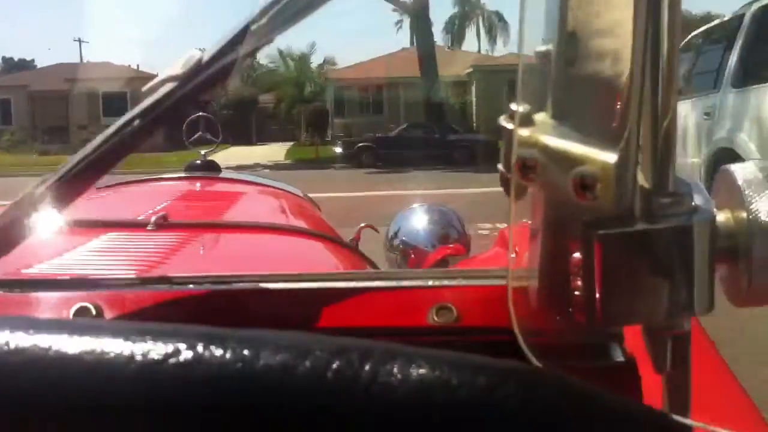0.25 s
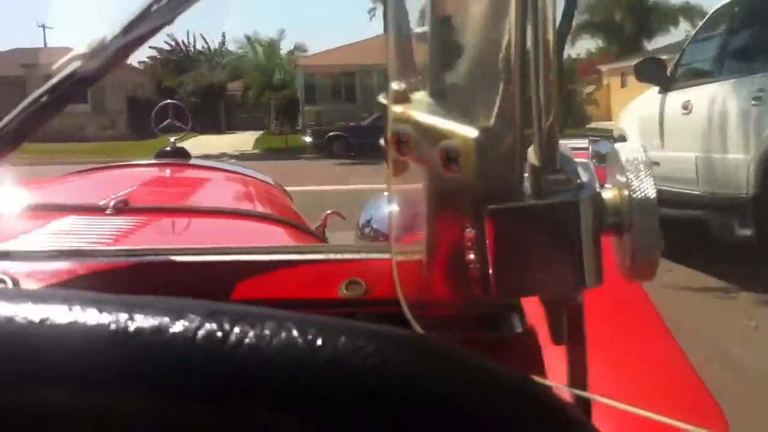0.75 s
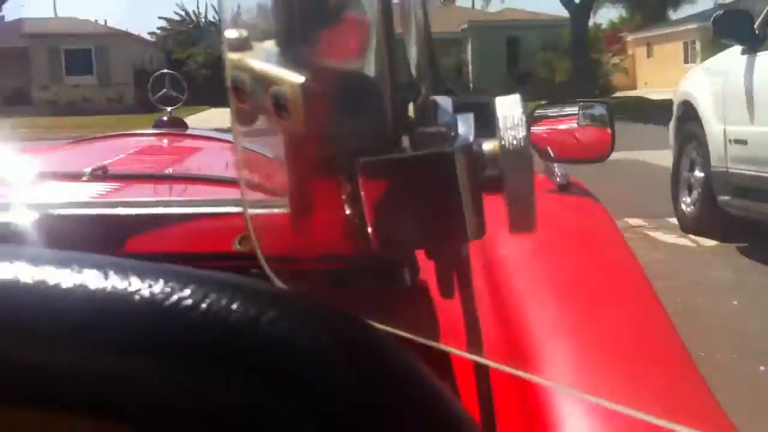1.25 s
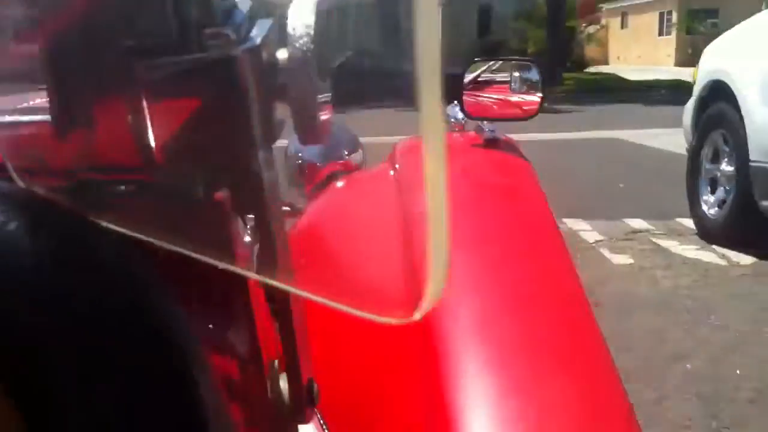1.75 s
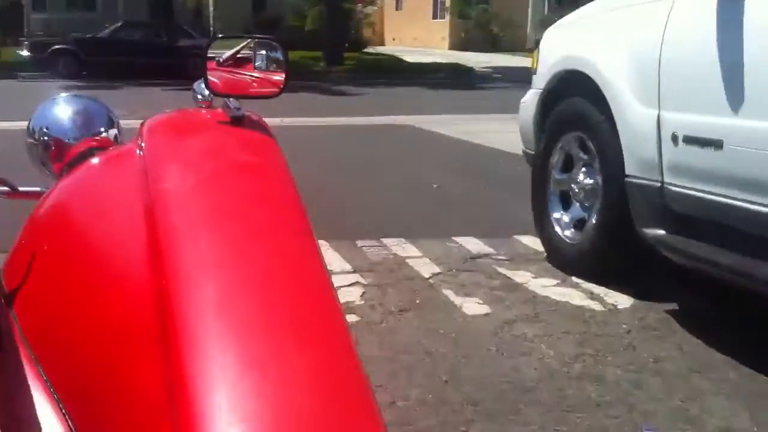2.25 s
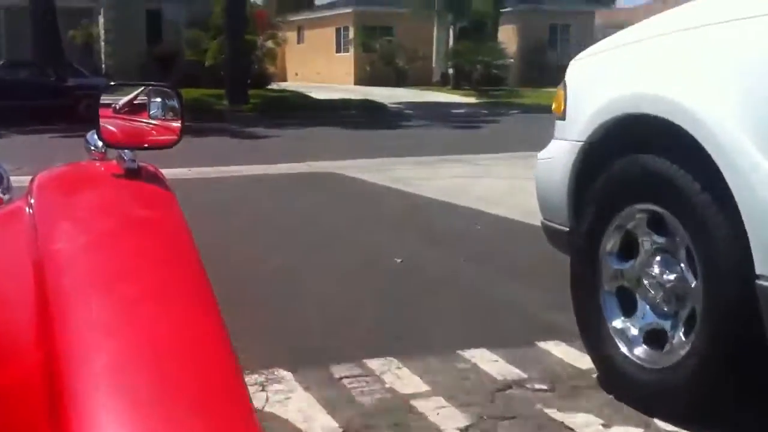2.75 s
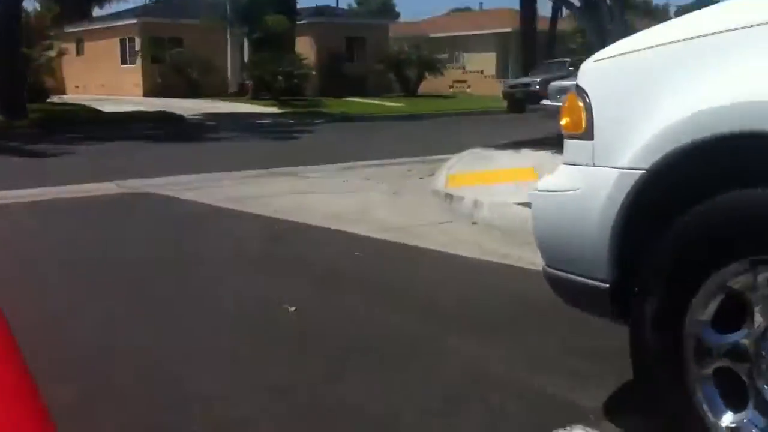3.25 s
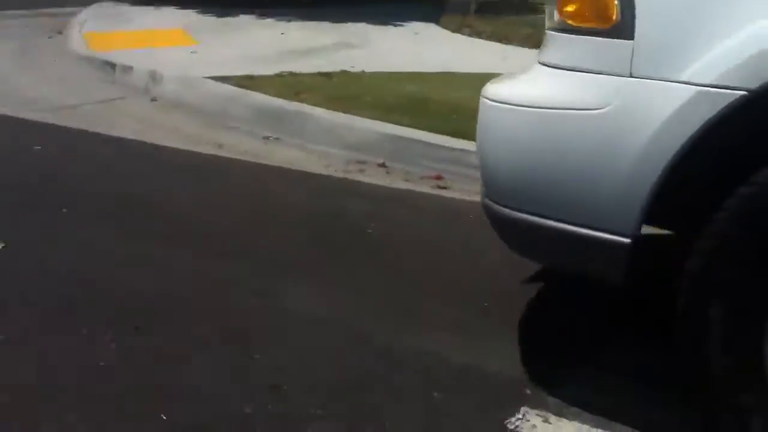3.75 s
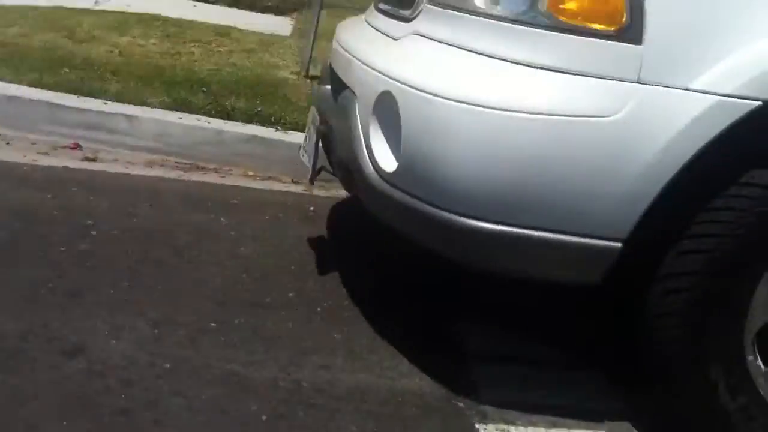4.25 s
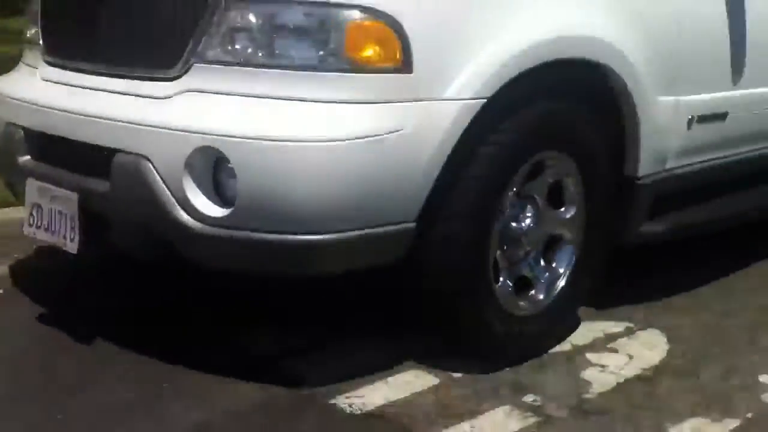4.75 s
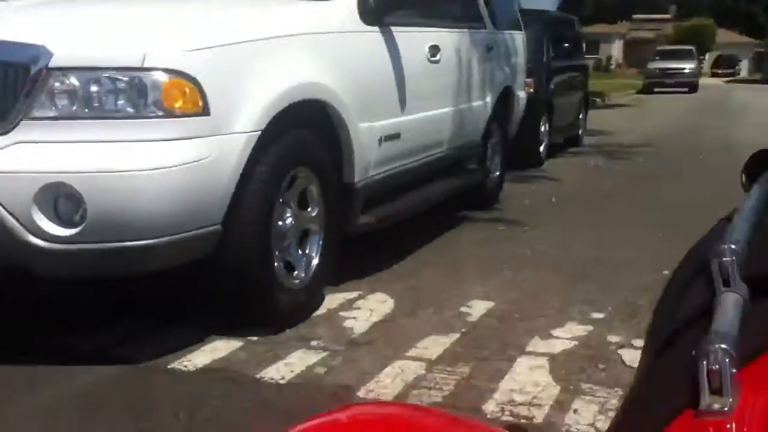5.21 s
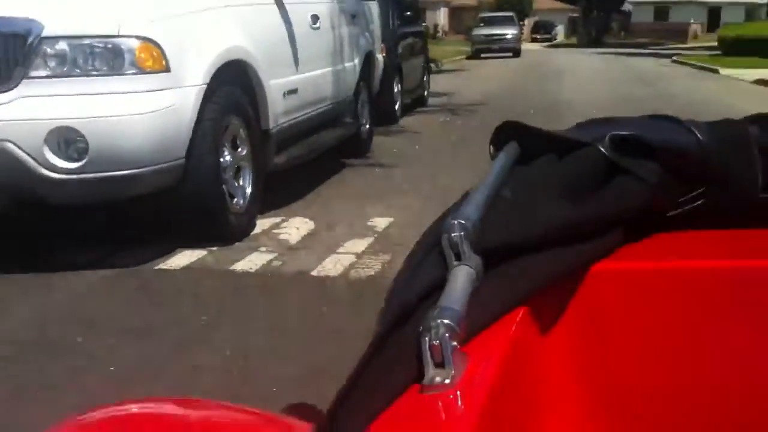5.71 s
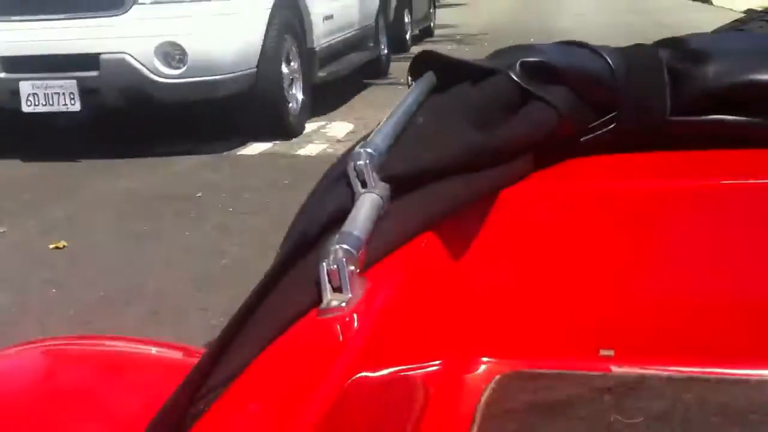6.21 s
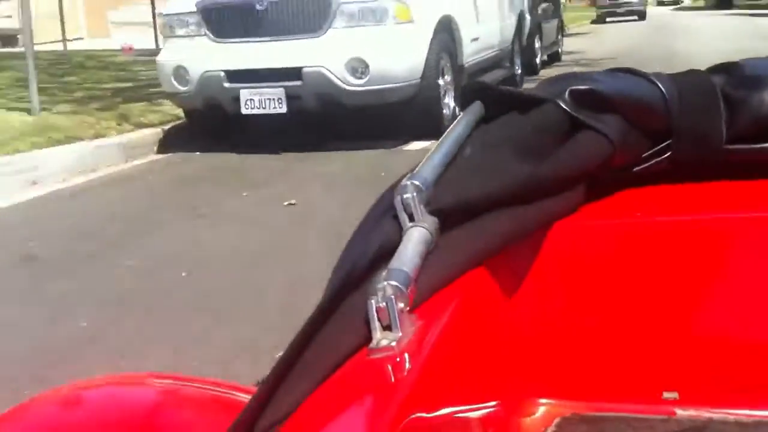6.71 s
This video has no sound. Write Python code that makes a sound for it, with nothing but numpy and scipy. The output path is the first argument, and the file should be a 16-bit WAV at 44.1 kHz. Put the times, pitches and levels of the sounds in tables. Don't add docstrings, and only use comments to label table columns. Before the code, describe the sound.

Steady low motor hum with faint whine in an open car, gradually overtaken by uneven wind buffeting, growing into a loud, cracking roar.

```python
import sys
import numpy as np
from scipy import signal
from scipy.io import wavfile
from scipy.ndimage import uniform_filter1d, minimum_filter1d, map_coordinates

SR = 44100
rng = np.random.default_rng(int(sys.argv[2]) if len(sys.argv) > 2 else 0)


def unload_wav(signal):
    wavfile.write(
        sys.argv[1],
        SR,
        np.round(np.clip(np.atleast_2d(signal).T, -1, 1) * 32767).astype(np.int16),
    )


def magnitude_from_level(level_db):
    exponent = np.asarray(level_db, float) / 20
    return 10 ** exponent


N = 307377


def rms_one(x):
    return x / np.sqrt(np.mean(x ** 2) + 1e-20)


def in_time(rows):
    s, *columns = np.transpose(rows)
    return [np.interp(np.arange(N) / SR, s, c) for c in columns]


def at_hz(points, hz):
    points = np.array(points)
    return np.interp(np.log(hz), np.log(points[:, 0]), points[:, 1])


def drift(rate_hz):
    r = np.exp(-32 * np.pi * rate_hz / SR)
    slow = signal.lfilter([1], [1, -2 * r, r * r], rng.standard_normal(N // 16 + 4002))
    slow = slow[4000:]
    return np.interp(np.arange(N) / 16, np.arange(len(slow)), rms_one(slow))


def resonance(x, hz, width_hz):
    r = np.exp(-np.pi * width_hz / SR)
    return signal.lfilter([1 - r, 0, r - 1], [1, -2 * r * np.cos(2 * np.pi * hz / SR), r * r], x)


def banded_noise(edges, level_db, patchy_db):
    out, white = 0, rng.standard_normal((2, N))
    for k, (low, high) in enumerate(zip(edges, edges[1:])):
        band_pass = signal.butter(2, [low, high], "band", fs=SR, output="sos")
        band = signal.sosfilt(band_pass, white[k % 2])
        out = out + band * magnitude_from_level(level_db(np.sqrt(low * high)) + patchy_db * drift(13.2))
    return rms_one(out)


# (time [s], four-stroke cycles per second [Hz])
ENGINE_SPEED = [(0, 11.38), (.6, 11.32), (1.05, 11.36), (1.5, 10.93), (2, 10.25), (3, 9.56), (4, 9.05),
                (4.9, 8.33), (5.5, 8.25), (6.97, 8.38)]


def crank_cycles():
    return np.cumsum(in_time(ENGINE_SPEED)[0]) / SR


# (multiple of the cycle [1], level [dB])
FRONT_ORDERS = [(1, -40), (2, -39), (3, -39), (4, -33), (5, -36), (6, -21), (7, -22), (8, -6), (9, -18),
                (10, -11), (11, -20), (12, -6), (13, -21), (14, -4), (15, -17), (16, -8), (17, -9), (18, 0),
                (19, -4), (20, -7), (21, -12), (22, -5), (23, -13), (24, -19), (25, -22), (26, -20),
                (27, -23), (28, -24), (29, -21), (30, -23)]
# (multiple of the cycle [1], level [dB])
TAIL_ORDERS = [(1, -46), (2, -41), (3, -45), (4, -40), (5, -41), (6, -34), (7, -28), (8, -12), (9, -22),
               (10, -13), (11, -13), (12, -5), (13, -15), (14, -13), (15, -12), (16, -7), (17, -7),
               (18, -3), (19, -10), (20, 0), (21, -5), (22, 0), (23, -3), (24, 0), (25, -9), (26, -11),
               (27, -5), (28, -9), (29, -10), (30, -10)]


def hum(cycles, tail):
    out, power = 0, 0
    for (order, front_db), (_, tail_db) in zip(FRONT_ORDERS[4:], TAIL_ORDERS[4:]):
        level = magnitude_from_level(front_db + tail * (tail_db - front_db))
        wander = .012 * order * drift(3)
        out = out + level * np.sin(2 * np.pi * (order * cycles + rng.random()) + wander)
        power = power + level ** 2 / 2
    return out / np.sqrt(power)


# (frequency [Hz], level [dB per Hz])
RUMBLE_SPECTRUM = [(25, -29), (50, -9), (70, -44), (110, -23), (170, 4), (210, 7), (260, -1), (320, -14)]


def rumble(tail):
    edges = 22.5 * 2 ** np.arange(0, 4, 1 / 3)
    return magnitude_from_level(-14 + 12 * tail) * banded_noise(edges, lambda hz: at_hz(RUMBLE_SPECTRUM, hz), patchy_db=1.5)


def firing_gate(cycles, depth_db, uneven_db):
    return magnitude_from_level(depth_db * np.cos(8 * np.pi * cycles) + uneven_db * np.cos(4 * np.pi * cycles + 1))


# (frequency [Hz], level [dB per Hz])
FRONT_CLATTER = [(170, -37), (290, -13), (365, 1), (483, -7.5), (749, -5), (982, -5.5), (1110, -16.5),
                 (1590, -13.5), (1780, -12), (3500, -21), (4550, -48), (7700, -120)]
# (frequency [Hz], level [dB per Hz])
TAIL_CLATTER = [(170, -31), (290, 13), (595, -12), (640, 1), (703, -3), (2410, -16), (3500, -46),
                (4550, -68), (7700, -120)]


def clatter(cycles, tail):
    def colour(hz):
        return at_hz(FRONT_CLATTER, hz) * (1 - tail) + at_hz(TAIL_CLATTER, hz) * tail
    edges = 285 * 2 ** np.arange(0, 3.6, .25)
    return banded_noise(edges, colour, patchy_db=1.5) * firing_gate(cycles, depth_db=0.0, uneven_db=0.1)


# (time [s], level [dB])
VALVE_LEVEL = [(0.0, -47), (0.39, -47.5), (1.1, -43), (1.8, -47.5), (2.3, -44.5), (2.79, -43.5),
               (3.0, -47.5), (3.6, -46), (4.75, -49.5), (5.35, -46.5), (5.63, -47.5), (5.75, -52.5),
               (6.6, -55), (6.97, -58)]
# (frequency [Hz], level [dB per Hz])
HISS_SPECTRUM = [(1470, -30), (2500, -25.5), (3200, -1), (4650, 1.5), (5150, -1.5), (6350, -1.5),
                 (7640, -8.5), (9720, -5.5), (11100, -13), (14700, -7.5), (16000, -19)]


def hiss(cycles):
    valve_db, = in_time(VALVE_LEVEL)
    air_db = valve_db - 10.5 - 0.24 * np.arange(N) / SR

    def colour(hz):
        return at_hz(HISS_SPECTRUM, hz) + (valve_db if hz < 8200 else air_db + 11)
    edges = 2900 * 2 ** np.arange(0, 2.6, .25)
    noise = magnitude_from_level(-49) * banded_noise(edges, colour, patchy_db=2.0)
    flicker = magnitude_from_level(0.85 * drift(17))
    return noise * flicker * firing_gate(cycles, depth_db=1.35, uneven_db=-0.2)


# (frequency [Hz], width [Hz], level [dB])
WHINE_LINES = [
    (898, 170, -58),
    (1060, 360, -54),
    (837, 54, -63.5),
]


def whines():
    out, white = 0, rng.standard_normal(N)
    for hz, width_hz, db in WHINE_LINES:
        line = resonance(resonance(white, hz, width_hz), hz, width_hz)
        out = out + magnitude_from_level(db + 2 * drift(1.6)) * rms_one(line)
    return out


# (middle [s], length [s], frequency [Hz], glide [Hz per s], level [dB])
GEAR_WHISTLES = [(1, .12, 1110, -60, -44), (1.7, 0.23, 970, -110, -50), (.72, .12, 720, 60, -56),
                 (.98, 0.08, 915, 0, -51), (.44, .07, 1125, 40, -52)]


def whistles():
    out, t, shake = 0, np.arange(N) / SR, .7 * drift(13)
    for s, length, hz, glide, db in GEAR_WHISTLES:
        age = t - s
        tone = np.sin(2 * np.pi * (hz + glide * age / 2) * age + shake)
        out = out + magnitude_from_level(db + 6.0) * np.exp(-(age / length) ** 2) * tone
    return out


def through_port(pressure):
    return signal.sosfilt(signal.butter(4, 115, "high", fs=SR, output="sos"), pressure)


def swing(width_ms, turn, order=3):
    u = np.arange(-100, 100) * 1000 / SR / width_ms
    return np.real(np.exp(2j * np.pi * turn) / (1 - 1j * u) ** order) * np.hanning(len(u))


def crackle(octaves, per_s=400, spread_db=6.0):
    born = rng.random(N) < per_s * 2 ** (1.5 * octaves) / SR
    strength_db = spread_db * np.minimum(rng.exponential(1, N), 3.5) + 6.7 * octaves
    sizes = born * magnitude_from_level(strength_db) * rng.choice([-1, 1], N)
    dealt = rng.integers(0, 3, N)
    shapes = [swing(0.13, 0.16), swing(1.0, 0.13), swing(0.13, 0.16)]
    return sum(np.convolve(sizes * (dealt == k), shape, "same") for k, shape in enumerate(shapes))


# (time [s], level [dB], brightness [dB])
BREEZE = [(1.6, -44.5, -20), (1.72, -30.5, -20), (2.5, -29, -20), (3.18, -33, -17.5), (3.24, -48, -20),
          (3.64, -47, -20), (3.7, -29.5, -20), (4.15, -30, -20), (4.29, -36, -22), (4.42, -23.5, -24),
          (4.68, -28.5, -24), (4.76, -38, -20), (5.3, -39, -20), (5.5, -28, -22), (6.2, -22, -22),
          (6.6, -28, -22), (6.66, -36, -23.5), (6.97, -23.5, -15.5)]
# (start [s], length [s], level [dB], brightness [dB])
GUSTS = [(1.686, 0.072, -24, -27), (1.87, 0.12, -19, -29.5), (2.013, 0.054, -22.5, -25),
         (2.076, 0.09, -18, -27.5), (2.222, 0.056, -19, -32), (2.285, 0.056, -17.5, -28),
         (2.533, 0.054, -15.5, -23), (2.745, 0.055, -14.5, -21.5), (2.904, 0.033, -19.5, -20.5),
         (2.975, 0.039, -11, -23.5), (3.025, 0.021, -17, -19), (3.087, 0.051, -14.5, -21),
         (3.145, 0.011, -16.5, -19), (3.177, 0.032, -21.5, -20.5), (3.377, 0.039, -19.5, -25),
         (3.71, 0.044, -23, -22.5), (3.8, 0.026, -18.5, -18), (4.053, 0.04, -15, -29),
         (4.39, 0.028, -17.5, -25), (4.512, 0.051, -13, -17), (4.574, 0.0133, -15.5, -19.5),
         (4.59, .062, -12, -20), (5.448, 0.064, -16.5, -20), (5.534, 0.028, -12.5, -21),
         (5.572, 0.048, -11, -18), (5.64, 0.024, -19, -24), (5.663, 0.037, -11.5, -17),
         (5.7, 0.029, -17.5, -18), (5.753, 0.0397, -13.5, -17), (5.79, 0.037, -16.5, -19),
         (5.832, 0.054, -12, -22), (5.914, 0.022, -18, -19), (5.938, 0.25, -13.5, -15),
         (6.198, 0.032, -15.5, -27.5), (6.255, 0.024, -17.5, -20.5), (6.298, 0.033, -12.5, -18),
         (6.336, 0.037, -18.5, -19.5), (6.375, 0.082, -13, -18), (6.454, 0.06, -14, -16),
         (6.614, 0.028, -18, -15.5), (6.681, 0.019, -18.5, -18.5), (6.7, .1, -14.5, -16),
         (6.804, 0.24, -12.5, -11)]
# (time [s], peak level [dB], brightness [dB])
PUFFS = [(1.786, -17, -26), (1.834, -13, -27.5), (1.895, -8, -30.5), (1.937, -8.5, -32.5),
         (2.125, -8.5, -28.5), (2.237, -12, -31), (2.43, -17.5, -24), (2.783, -2.5, -17), (2.978, 5, -23.5),
         (3.119, -3, -13), (3.462, -12.5, -24.5), (3.68, -6, -27), (3.899, -16, -26), (3.994, -19.5, -21.5),
         (4.13, -8.5, -33), (4.356, -18.5, -24), (4.429, -8.5, -25), (4.454, -1, -20), (4.613, -5, -22.5),
         (4.674, -9, -27), (5.576, -0.5, -14), (6.261, -8.5, -19.5), (5.755, -4, -16.5), (5.85, -5, -31.5),
         (5.941, 0, -10.5), (6.037, -0.5, -10.5), (6.123, -0.5, -11), (6.544, -6, -15.5),
         (6.703, -6, -14.5), (6.9, -2.5, -12.5)]


def stream_power():
    level_db, bright_db = in_time(BREEZE)
    ms = np.arange(N) / SR * 1000
    power = magnitude_from_level(2 * level_db) * (ms > BREEZE[0][0] * 1000) + 1e-12
    tone = power * (bright_db + 17.5)
    # (start [s], level [dB], brightness [dB], hold [ms], rise [ms], fall [ms])
    swells = [(s, db, bright, length * 1000, 2.466, 5.) for s, length, db, bright in GUSTS]
    swells += [(s - .0014, db - 11, bright, 0, 1.6, 11) for s, db, bright in PUFFS]
    lull_db, lulls_hz, steady_ms = 3., 35.3, 45
    lulls = magnitude_from_level(-2 * lull_db * np.maximum(drift(lulls_hz) + 0.2904, 0) ** 1.497)
    for s, db, bright, hold_ms, rise_ms, fall_ms in swells:
        start = round(s * SR)
        age = ms[:min(N - start, SR // 2)]
        near = slice(start, start + len(age))
        after = np.maximum(age - np.maximum(hold_ms - fall_ms, 0), 0)
        swell = magnitude_from_level(2 * db) * (1 - np.exp(-age / rise_ms)) ** 2 * np.exp(-(after / fall_ms) ** 2)
        swell *= lulls[near] ** np.clip(hold_ms / steady_ms - 1, 0, 1)
        power[near] += swell
        tone[near] += swell * (bright + 17.2)
    return power, tone / power


# (time [s], edge peak [dB], top end under it [dB])
SNAPS = [(1.9398, -36.5, -11), (2.1234, -36, -9), (2.2363, -37.5, -10), (2.5408, -32.5, -15),
         (2.5796, -35.5, -11), (2.7819, -32, -14), (2.7876, -26.5, -27), (2.924, -35, -13),
         (2.9791, -31, -22), (2.9964, -35, -17), (3.0146, -37, -13), (3.0368, -35, -14), (3.046, -38, -11),
         (3.0904, -37, -6), (3.1191, -19, -23), (3.132, -31.5, -17), (3.1559, -36, -11),
         (3.1986, -34.5, -14), (3.3924, -38.5, -10.5), (3.8079, -27, -17), (4.3989, -36, -14.5),
         (4.4576, -31, -12), (4.5144, -36, -15), (4.5214, -29.5, -15.5), (4.5291, -22, -28),
         (4.5403, -20.5, -29.5), (4.5537, -26.5, -18), (4.5596, -26.5, -23.5), (4.5793, -31, -21),
         (4.6022, -29, -23), (4.6118, -31, -19), (4.622, -31.5, -19), (4.6413, -27.5, -21.5),
         (5.4513, -34.5, -14), (5.4605, -36, -8.5), (5.5366, -29.5, -18), (5.5483, -36, -11),
         (5.576, -18, -26.5), (5.582, -20, -25.5), (5.597, -26, -22), (5.611, -39, -10),
         (5.6697, -16, -33.5), (5.6835, -27.5, -16), (5.6908, -28, -23.5), (5.7116, -28, -21),
         (5.7235, -26, -22), (5.7571, -20.5, -21), (5.7644, -30, -21.5), (5.7862, -24, -26),
         (5.8014, -34.5, -11), (5.8764, -23, -24.5), (5.8847, -34, -20.5)]
# (time [s], edge peak [dB], top end under it [dB])
LATE_SNAPS = [(5.9415, -21, -16.5), (5.9503, -17, -24), (5.9688, -20, -26.5), (5.9732, -25.5, -23),
              (5.9836, -25, -29), (5.9892, -26.5, -32), (6.0088, -26, -17), (6.0375, -14, -24.5),
              (6.0488, -17.5, -20.5), (6.0557, -22.5, -19.5), (6.0591, -21.5, -17), (6.0644, -20.5, -21),
              (6.0812, -15.5, -25), (6.0956, -23.5, -18), (6.124, -15, -24), (6.1685, -19.5, -16.5),
              (6.205, -35, -22.5), (6.2292, -26, -31), (6.2613, -33, -21.5), (6.2794, -35, -18),
              (6.3062, -28, -28.5), (6.3139, -27, -27), (6.335, -31.5, -22), (6.3544, -25.5, -22),
              (6.3839, -22, -23), (6.39, -18, -23), (6.4198, -26, -25), (6.4657, -26, -23.5),
              (6.4795, -26.5, -26), (6.4954, -24.5, -25), (6.5081, -27, -28), (6.5453, -24.5, -27),
              (6.556, -16.5, -26), (6.6155, -35.5, -15), (6.6243, -26, -22), (6.634, -30, -23),
              (6.6822, -28, -38), (6.7034, -22.5, -19), (6.7073, -19.5, -28), (6.7209, -25, -21),
              (6.7338, -22, -22), (6.753, -25.5, -18.5), (6.7652, -23.5, -23), (6.7795, -28.5, -8),
              (6.8098, -15, -20), (6.8321, -15, -16), (6.8377, -17.5, -16), (6.8464, -14, -21),
              (6.8569, -16, -18.5), (6.8643, -18.5, -17), (6.8769, -21, -23), (6.8987, -23.5, -21),
              (6.9038, -18.5, -21.5), (6.9218, -13, -21), (6.9365, -12, -23), (6.9452, -27, -23.5),
              (6.9611, -22.5, -14.5)]
TOP_OCTAVES = 1.3


def stream_octaves(tone_db, lumps_db, db_per_octave=9.):
    octaves = np.clip((tone_db + .8 * lumps_db) / db_per_octave, -2, 1.5)
    octaves += .12 * (np.clip(drift(70.85), 0, 2) ** 2 - .6)
    crack_octaves, crack_ms = .62, 6.5
    for s, db, _ in SNAPS + LATE_SNAPS:
        near = slice(round(s * SR), round(s * SR) + 2500)
        age = np.arange(len(octaves[near])) / SR * 1000
        spurt = (1 - np.exp(-age / .8)) * np.exp(-age / crack_ms)
        octaves[near] += crack_octaves * max(db + 44, 0) / 20 * spurt
    return np.minimum(octaves, TOP_OCTAVES)


def wind(lumpy_db=1.77, corner_hz=470, jerky_octaves=.36):
    power, tone_db = stream_power()
    lumps_db, grains = lumpy_db * drift(45.4), drift(278.9)
    octaves = stream_octaves(tone_db, lumps_db)
    sweep_hz = corner_hz * 2 ** np.minimum(octaves + jerky_octaves * grains, TOP_OCTAVES + .25)
    place = np.cumsum(sweep_hz) * 16 / SR
    field = signal.lfilter(*signal.butter(2, 4 / 16), rng.standard_normal(400000))
    field = signal.lfilter([1], [1, -.55], field)
    field = signal.lfilter([1], [1, -.82], field)
    pressure = map_coordinates(rms_one(field), [place % len(field)], order=3)
    pressure = through_port(pressure + magnitude_from_level(-44.0) * crackle(octaves))
    pressure /= (uniform_filter1d(pressure ** 2, size=500) + 0.007) ** 0.48
    return magnitude_from_level(1.0 + lumps_db) * np.sqrt(power) * pressure


def snaps():
    snap_ms, snap_db, wake_ms, wake_db = 0.16, 3.5, 4.5, -8
    out, events = np.zeros(N + 1000), SNAPS + LATE_SNAPS
    edge = signal.butter(2, [2000, 6000], "band", fs=SR, output="sos")
    for (s, db, top_db), wake in zip(events, rng.random((len(events), 5, 3))):
        width_ms = snap_ms * magnitude_from_level(np.clip(-.45 * (top_db + 20.5), -3, 4) if db > -29 else 5.5)
        for k, (turn, late, size) in enumerate(wake):
            follows = k > 0
            shape = swing(width_ms * (1 + .5 * size * follows), turn, order=2)
            height = np.abs(signal.hilbert(signal.sosfilt(edge, shape))).max()
            start = s * SR + follows * (1.3 * late - .3) * wake_ms * SR / 1000
            level = magnitude_from_level(db + snap_db + follows * (wake_db - 12 * size))
            out[round(start) - 50:][:200] += level * shape / height
    return out[:N]


# (time [s], peak level [dB], frequency [Hz])
THUMPS = [(1.831, -9, 380), (1.894, -8, 248), (1.936, -2, 197), (2.09, -2, 280), (2.124, -1, 199),
          (2.236, -7, 360), (2.288, -27, 256), (2.326, -3, 171), (2.537, -7, 269), (2.752, -5, 194),
          (2.784, -18, 248), (2.889, -8.5, 192.7), (2.977, -10, 167), (3.087, -8.5, 280), (3.126, 2.5, 350),
          (3.389, -10, 254.6), (3.465, -14, 193.9), (3.68, -9, 204.6), (4.063, -9, 173.8), (4.127, -7, 195),
          (4.395, -8, 183.5), (4.455, -1.5, 242), (4.512, -6, 229), (4.573, -4.5, 324), (4.611, -1, 177),
          (4.638, 2, 169), (5.461, -8, 213), (5.534, -5, 179.2), (5.575, -3, 321.8), (5.654, -2, 256.7),
          (5.755, -10, 350), (5.851, -2.5, 195), (5.938, -1.5, 174), (6.143, -0.5, 361), (6.304, -0.5, 255),
          (6.551, -5, 212.3), (6.628, -3.5, 210), (6.701, -2.5, 307),
          (2.6, -11, 124.9), (2.976, -16, 104), (4.404, -11, 136), (4.44, -11, 115), (4.528, -12.5, 120.3),
          (4.621, -10, 126), (5.655, -9.5, 100), (6.2, -8, 180), (6.36, -2, 151), (6.83, -7.5, 199.9),
          (6.905, 2, 209.2)]


def thumps():
    out, t = np.zeros(N + 2000), np.arange(2000) / SR
    for s, db, hz in THUMPS:
        c = t * hz
        phase = c + 0.69 * 0.61 * (1 - np.exp(-c / 0.29)) + rng.random()
        decay = (1 - np.exp(-c / 0.52)) * np.exp(-(c / 1.65) ** 1.26)
        out[round(s * SR):][:len(t)] += magnitude_from_level(db + 0.5) * decay * np.sin(2 * np.pi * phase)
    return out[:N]


# (time [s], peak level [dB], frequency [Hz], length [ms])
BODY_TICKS = [
    (1.6721, -39, 14500, 1.3),
    (3.47, -40.5, 6430, 2.65),
    (4.491, -43.5, 4400, 11),
]
# (time [s], level [dB], length [ms])
RUSTLE = (4.035, -45, 22)


def ticks():
    out = np.zeros(N + SR)
    rustle_s, rustle_db, rustle_ms = RUSTLE
    bursts = [(*tick, .3) for tick in BODY_TICKS] + [(rustle_s, rustle_db, 9000, rustle_ms, 1.2)]
    for s, db, hz, ms, share in bursts:
        t = np.arange(2000) / SR * 1000 / ms
        noise = rms_one(resonance(rng.standard_normal(len(t)), hz, share * hz))
        out[round(s * SR):][:len(t)] += magnitude_from_level(db + 4) * noise * t * np.exp(1 - t ** 2) / 2
    return out[:N]


# (time [s], hum [dB], clatter [dB], whine [dB], facing the tail [0-1])
MICROPHONE_TURN = [(0, -25.5, -35.5, 8.5, 0), (.6, -24.5, -35.5, 6, 0.05), (.9, -26, -34, 13.5, 0.08),
                   (1.15, -26, -33.5, 11, 0.1), (1.5, -28.5, -36, 11.5, 0.12),
                   (2.2, -23.5, -33.5, -17, 0.41), (3.3, -32.5, -37, -22, 0.38), (4.3, -30, -38, -31.5, 1),
                   (4.75, -32.5, -41.5, -30.5, 0.9), (5.3, -28.5, -39.5, -29.5, 0.85),
                   (5.7, -35, -44.5, -30.5, 0.87), (6.97, -27.5, -43, -33, 1)]


def scene():
    cycles = crank_cycles()
    hum_db, clatter_db, whine_db, tail = in_time(MICROPHONE_TURN)
    tail = np.clip(tail, 0, 1)
    engine = magnitude_from_level(hum_db) * (hum(cycles, tail) + rumble(tail))
    engine += magnitude_from_level(clatter_db) * clatter(cycles, tail) + hiss(cycles)
    engine += magnitude_from_level(whine_db) * whines() + whistles()
    air = through_port(wind() + snaps() + thumps())
    return (engine + air + ticks())[None]


def band_limit(x):
    return signal.sosfilt(signal.butter(12, 16130, fs=SR, output="sos"), x)


def record(dry):
    ceiling = .705
    over_db = np.maximum(20 * np.log10(np.abs(dry[0]) / ceiling + 1e-9), 0)
    ramp = 90 * np.arange(N) / SR
    held = np.maximum.accumulate(over_db + ramp) - ramp
    held = uniform_filter1d(-minimum_filter1d(-held, size=261), size=255)
    top_cut = signal.cheby2(24, 70, 15950, fs=SR, output="sos")
    mix = signal.sosfilt(top_cut, dry * magnitude_from_level(-held))
    return band_limit(mix)


dry = scene()
out = record(dry)
unload_wav(out)
```